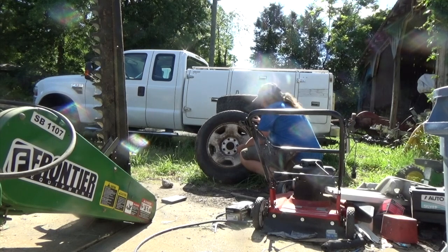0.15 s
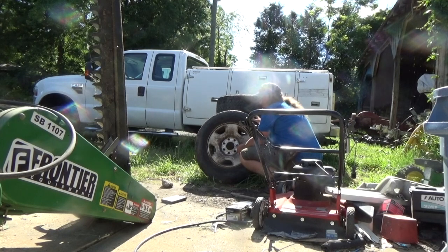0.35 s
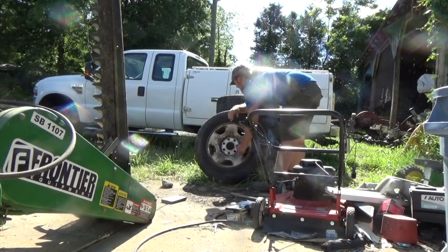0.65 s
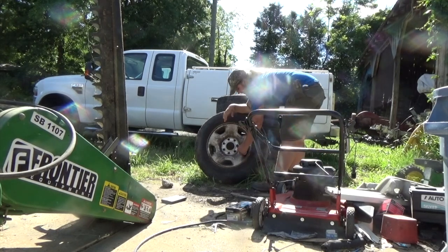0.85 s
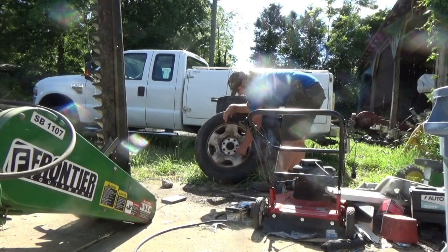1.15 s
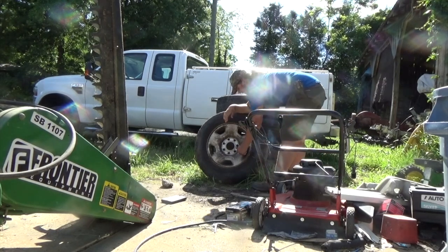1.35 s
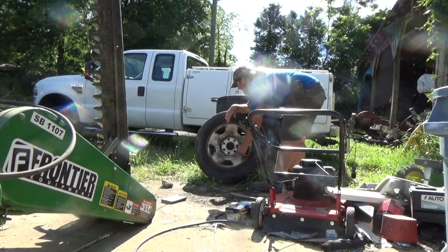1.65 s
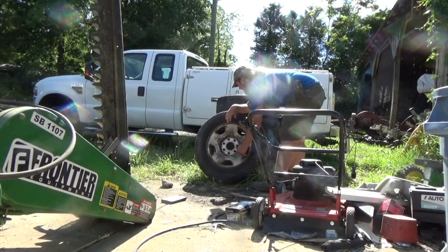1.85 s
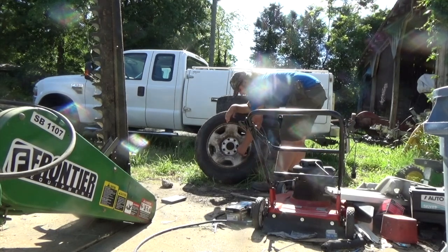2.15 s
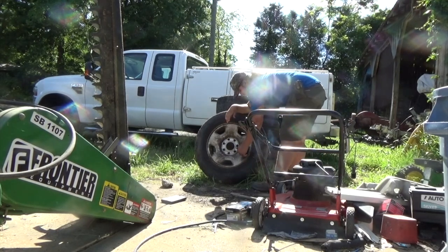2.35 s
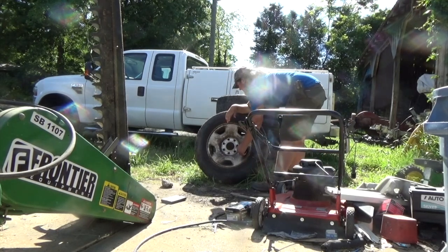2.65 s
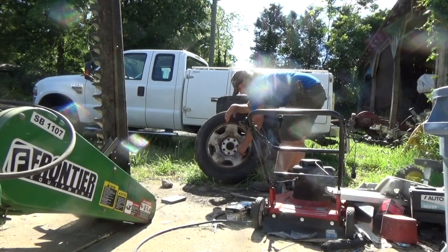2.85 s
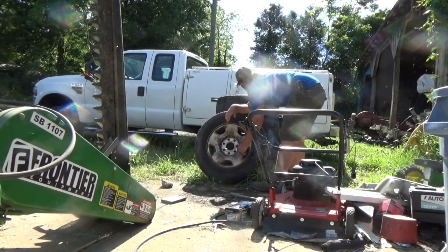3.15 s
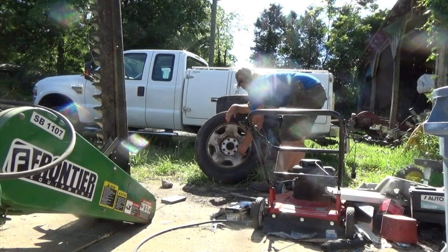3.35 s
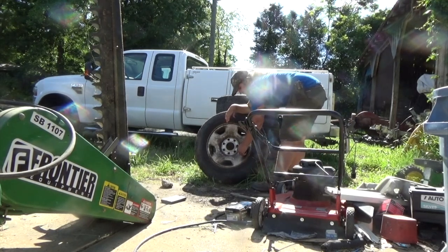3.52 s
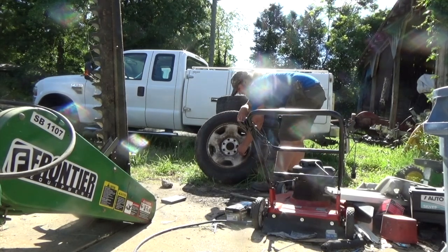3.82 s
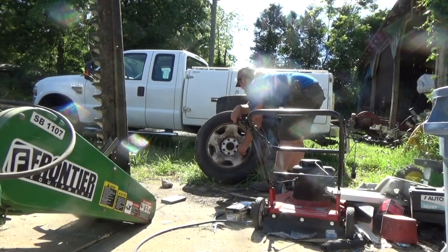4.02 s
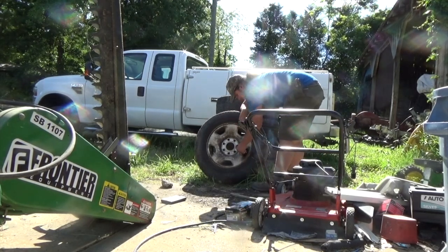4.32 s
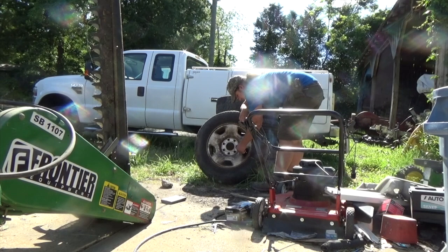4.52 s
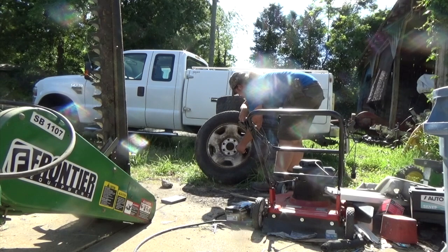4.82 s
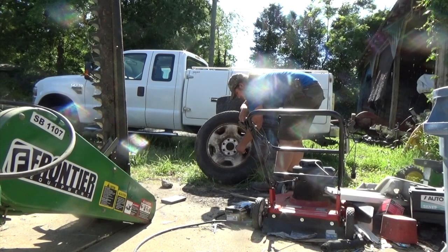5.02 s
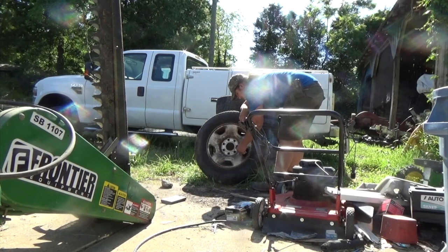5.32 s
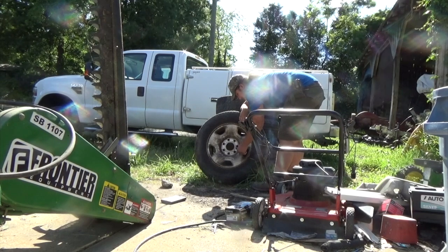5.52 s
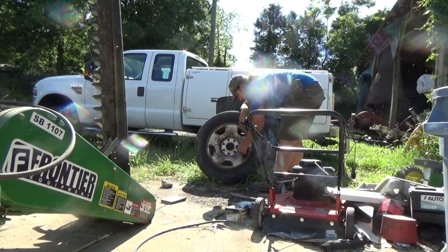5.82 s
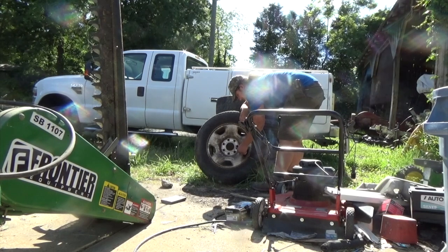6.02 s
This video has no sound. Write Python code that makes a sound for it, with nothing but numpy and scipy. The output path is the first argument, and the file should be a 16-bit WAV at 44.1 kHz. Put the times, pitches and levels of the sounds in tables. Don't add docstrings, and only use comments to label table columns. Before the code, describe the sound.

Air hisses steadily from a tire valve with a thin, high whistle, while fingers squeak on rubber, air sputters, and a tool clicks on the rim.

```python
import sys
import numpy as np
from scipy import signal
from scipy.fft import rfft, irfft
from scipy.io import wavfile
from scipy.ndimage import uniform_filter1d

SR = 44100
rng = np.random.default_rng(int(sys.argv[2]) if len(sys.argv) > 2 else 0)


def generate_wav(signal):
    frames = np.transpose(np.atleast_2d(signal))
    scaled = np.clip(frames, -1, 1) * 32767
    pcm = np.round(scaled).astype(np.int16)
    wavfile.write(sys.argv[1], SR, pcm)


def field_ratio(decibels):
    return 10 ** (np.asarray(decibels, dtype=float) / 20)


N = 272097

# (t/s, level/dB)
WHISTLE_LEVEL = [(0.0, -29), (0.57, -28.5), (0.62, -30), (1.67, -31), (2.32, -30.5), (2.97, -31),
                 (3.16, -27.5), (4.16, -24), (4.38, -26.5), (4.47, -25.5), (4.71, -26), (5.62, -24.5),
                 (5.7, -23), (6.17, -23.5)]
# (t/s, f/Hz, left-right level/dB)
WHISTLE_PITCH = [(0, 2399.9, 1.0), (1.5, 2399.7, .9), (3.0, 2400.1, 1.0), (3.5, 2400.6, 1.4),
                 (6.17, 2401, 1.3)]
# (t/s, depth/dB)
FALTERS = [(.955, 1.5), (1.262, 1.5), (1.72, 1.5), (1.86, 1), (2.56, 1.5), (2.82, 1), (3.01, 1), (3.125, 0),
           (3.36, 1.5), (3.48, 1), (3.7, 1.5), (3.83, 1), (3.94, 0.5), (4.295, 3), (4.35, 2.5), (4.41, 2),
           (4.6, 1), (4.77, 1), (4.915, 1), (5.35, 1.5), (5.55, 1), (5.63, 1.5)]
# (t/s, f/Hz)
FLUTTER_RATE = [(0, 328), (.7, 328.6), (1.25, 327.1), (2.25, 327.5), (3.25, 327.5), (4.25, 326.2),
                (4.75, 326.3), (5.25, 324.8), (6.17, 323)]
# (t/s, level/dB)
LOCK = [(0, 7), (.3, 1), (1.3, 1.5), (1.9, -1), (2.5, 5), (2.9, 0), (4.3, 5.5), (4.8, 4.5), (5.1, 8.5),
        (5.45, 12.5), (5.72, 9.5), (6.05, 12.5)]
# (whistle multiple, flutter multiple, start level/dB, middle level/dB, end level/dB)
COMBINATION_TONES = [(0, 2, -62.5, -62.5, -60.5), (0, 3, -64, -66, -64), (0, 4, -62, -61, -55.5),
                     (0, 12, -47.5, -50, -54.5), (0, 18, -50, -49, -60), (0, 24, -56, -58, -53),
                     (0, 30, -67, -55, -61), (1, -1, -50, -46.5, -55), (1, 1, -45.5, -51.5, -57.5),
                     (1, 2, -60, -61, -56.5), (1, 3, -48, -58.5, -50.5), (2, -1, -57, -60, -67),
                     (2, 1, -57, -57, -62), (3, 0, -50, -58, -59), (4, 0, -58, -66, -57)]
# (t/s, level/dB, gap resonance f/Hz, upper resonance relative level/dB, its f/Hz)
TURNED_JET = [(1.9, -38, 7500, -6, 11500), (2.17, -41.5, 8350, -5, 11600), (2.45, -39, 8400, -13, 12100),
              (2.71, -37.5, 6440, -11, 13600), (2.95, -39, 5840, -2, 11700), (3.27, -44, 6000, -5, 12000),
              (3.42, -38, 6000, -2, 11300), (3.58, -40.5, 6500, 1, 12600), (3.75, -44.5, 7140, -1, 13300),
              (4.35, -45, 6530, -6, 14000)]
# (t/s, peak level/dB, upper resonance relative level/dB, length/s, gap f/Hz)
PUFFS = [(2.225, -40, -6, .012, 8500), (2.294, -38, 3, 0.0092, 8800), (2.338, -32, -17, .01, 8600),
         (2.39, -31, -12, 0.022, 7600), (2.413, -33, -8, 0.022, 8800), (2.498, -36, -15, .012, 7500),
         (2.519, -24, -18, .023, 7600), (2.536, -34, -20, .022, 7800), (2.645, -42, -26, .03, 6500),
         (2.721, -35, -12, .01, 7000), (2.737, -19, -16, 0.0097, 6340), (2.759, -24, -16, .011, 5900),
         (2.774, -26, -14, .012, 6200), (2.796, -28, -7, 0.012, 6800), (2.809, -20, -8, 0.012, 5930),
         (2.856, -25.5, -11, 0.013, 5670), (2.888, -26, -12, .012, 4970), (2.96, -36, -2, .01, 5200),
         (2.973, -29, -8, .022, 7400), (3.007, -29, 1, 0.015, 6000), (3.046, -30, -10, .014, 6800),
         (3.063, -34, -12, 0.018, 4900), (2.83, -32, -12, .012, 5200), (2.922, -33, -10, .012, 4800),
         (3.091, -26, -7, .015, 4970), (3.152, -32, -8, .012, 5200), (3.177, -30.5, -4, .028, 6200),
         (3.202, -29.5, -1, .018, 5900), (3.464, -24, -8, 0.013, 6200), (3.487, -29, -16, 0.012, 6500),
         (3.498, -21.5, 1, 0.0092, 6400), (3.5, -31, -10, .023, 6300), (3.666, -32, -3, .01, 7000),
         (3.688, -29, -1, 0.026, 7000), (4.045, -34.5, -4, 0.043, 6100), (4.092, -37, -9, 0.022, 6500)]
# (t/s, f/Hz)
SLIP_RATES = [
    [(.31, 2950), (.316, 2300), (.343, 2950), (.348, 3450), (.354, 3470), (.3575, 2900), (.361, 2700),
     (.367, 2550), (.374, 2650)],
    [(.387, 2780), (.395, 2330), (.402, 2500), (.41, 2400), (.424, 2500), (.433, 2330), (.444, 2520),
     (.452, 2620), (.456, 2350)],
    [(.459, 2680), (.466, 2420), (.483, 2520), (.495, 2330), (.503, 2450), (.51, 2360), (.518, 2150)],
    [(.632, 3060), (.641, 2950), (.65, 2330), (.666, 2350), (.672, 2620), (.682, 2560)],
    [(.82, 2500), (.835, 2380), (.884, 2350), (.895, 2170), (.905, 2170), (.923, 2620), (.936, 2480)],
    [(1.422, 3200), (1.428, 2830), (1.444, 2720), (1.455, 2560), (1.461, 2250), (1.4625, 2520),
     (1.468, 2220), (1.473, 2200)],
    [(1.478, 2800), (1.481, 2800), (1.486, 2260), (1.491, 2150), (1.494, 2460), (1.5, 2300), (1.511, 2200),
     (1.52, 2520), (1.524, 3000)],
    [(1.806, 2900), (1.812, 2450), (1.818, 2200), (1.825, 2630), (1.84, 2140), (1.852, 2300)],
]
# (t/s, length/s, level/dB, loudest region f/Hz)
SQUEAKS = [(.343, 0.017, -25.5, 7200), (.344, 0.0074, -25, 11500), (0.352, 0.0076, -21.5, 12000),
           (0.361, 0.021, -27, 11100), (0.384, 0.014, -25, 9900), (0.4, 0.0073, -29, 4900),
           (0.478, .018, -37, 4900), (.5, .022, -37, 4500), (0.439, 0.021, -41, 5070),
           (0.356, .017, -35, 5300), (0.309, 0.011, -39, 5600), (1.457, .013, -38, 4700),
           (1.493, 0.018, -43, 4600), (1.512, .01, -42, 4800), (1.48, .011, -38, 4900),
           (.412, .02, -40, 4900), (.459, .009, -37, 5000), (.49, .008, -39, 4700), (.344, .006, -39, 3200),
           (.354, .007, -34, 3000), (.366, .007, -38, 5200), (1.43, .005, -35, 5500),
           (0.426, 0.012, -32.5, 9600), (.633, .016, -35, 5600), (.634, 0.0085, -27, 12000),
           (0.667, 0.013, -25, 12700), (.824, .012, -36, 14300), (0.873, .04, -39, 4500),
           (0.427, 0.055, -40, 2600), (1.441, 0.045, -37, 2700), (1.811, 0.028, -43, 2700),
           (0.9, 0.011, -32, 12500), (0.923, 0.01, -30, 9900), (1.422, 0.0055, -22.5, 11100),
           (1.424, 0.0037, -33, 6100), (1.442, 0.017, -32, 5200), (1.449, 0.023, -36, 7600),
           (1.47, 0.011, -27, 12500), (1.474, 0.008, -36, 5400), (1.496, 0.0066, -26.5, 13800),
           (1.521, 0.006, -32.5, 6000), (1.804, 0.0068, -21, 12700), (1.811, 0.0054, -26, 14300),
           (1.818, 0.0065, -30, 7500), (1.84, .012, -31, 14000)]
# (t/s, length/s, level/dB, loudest region f/Hz)
RUBS = [
    (.339, 0.064, -39, 3000),
    (.397, .125, -44, 4700),
    (0.615, 0.054, -43, 3000),
    (1.437, 0.082, -37, 4700),
    (1.479, .05, -46, 4500),
    (1.802, 0.029, -44, 4600),
]
# (t/s, peak level/dB, f/Hz, left-right level/dB)
TICKS = [(.346, -26, 650, 0), (0.354, -15, 1340, 0), (1.446, -24, 850, 0), (1.807, -28, 1240, 0),
         (4.951, -22, 1700, 3), (4.975, -10, 1500, 1), (5, -18, 1400, 3), (5.016, -19, 1350, -3),
         (5.037, -10, 1600, 4), (5.028, -19, 1400, 3), (5.062, -12.5, 1200, 0), (5.135, -10.5, 1400, -3),
         (5.238, -20, 1000, 0), (5.336, -10, 1500, 4), (5.347, -18.5, 950, -1), (5.353, -10.5, 1700, 1),
         (5.432, -11.5, 1600, -2), (5.443, -15, 1800, 0), (5.508, -24, 1200, 1), (5.6375, -17, 1100, 0),
         (5.641, -11.5, 1400, 0), (5.6685, -10.5, 1600, 0)]
# (t/s, peak level/dB, f/Hz, left-right level/dB)
KNOCKS = [(0.346, -25, 430, 0), (0.344, -33, 110, -1), (0.353, -22.5, 400, 0), (.351, -33, 130, 0),
          (.3535, -10, 3050, 0), (.346, -20, 3200, 0), (.367, -22, 4500, -2), (.635, -32, 3500, 0),
          (1.423, -31, 4000, 0), (1.806, -32, 5000, 2), (2.3, -30, 3200, 0), (2.346, -15, 2900, 3),
          (2.356, -18, 3300, 0), (2.32, -20, 2800, 0), (2.375, -20, 3000, 0), (2.41, -21, 2800, 0),
          (2.388, -21, 1300, -2), (2.53, -20, 3100, 0), (2.735, -19, 6500, 0), (2.976, -18, 7500, 0),
          (3.4955, -16, 6500, 0), (3.498, -14, 9000, 0), (1.088, -29, 400, 0), (1.088, -24, 3000, 0),
          (1.112, -32, 400, 0), (1.112, -24, 1200, 0), (1.13, -40, 90, 0), (5.641, -22, 3000, 0),
          (4.975, -25, 2900, -3), (5.037, -17, 3000, -3), (5.062, -18, 3300, 3), (5.325, -30, 250, 0),
          (5.324, -36, 95, -4), (5.353, -20, 3300, 0), (3.668, -20, 3200, 0), (3.7, -22, 3000, 0)]
# (f/Hz, level/dB per Hz)
HISS_SPECTRUM = [(20, -5.5), (100, -6), (600, -6), (1200, -3), (1800, 0), (2150, 4), (2350, 2), (2520, -2),
                 (3500, -2), (6000, -2), (10000, -1.5), (13500, -4), (16000, -1)]
# (t/s, level/dB)
FLOW = [(0, 1.5), (.43, 3.5), (1.12, 1.5), (2.08, 2), (2.63, 2), (3.2, 2), (3.56, 0), (4.0, 1.5), (4.19, 1),
        (4.42, -2), (4.86, -1.5), (5.5, 1), (6.17, 0)]
# (f/Hz, left-right likeness)
COHERENCE = [(60, 0.89), (550, 0.79), (1200, 0.94), (2400, 0.74), (5000, 0.52), (15000, 0.61)]
# (f/Hz, left-right level/dB)
BALANCE = [(60, -1.5), (240, -0.5), (950, -0.5), (3770, -1), (15000, -2.5)]
# (t/s, hiss share 0-1, whistle band share 0-1)
STEREO_SHARE = [(0, .05, .08), (3.15, .04, .05), (3.3, .08, .8), (3.8, .2, .85), (4.15, .5, .9),
                (4.25, .97, .95), (6.17, .97, 1)]

TOOL_FROM_S = 4.9


def evened(x):
    return x / np.sqrt(np.mean(x ** 2) + 1e-20)


def read(points, hz):
    f, value = np.transpose(points)
    return np.interp(np.log(hz + 1), np.log(f + 1), value)


def columns(rows, t):
    s, *rest = np.transpose(rows)
    return [np.interp(t, s, c) for c in rest]


def wander(hz):
    z = rfft(rng.standard_normal(N))
    lowpass = 1 + (np.fft.rfftfreq(N, 1 / SR) / hz) ** 2
    return evened(irfft(z / lowpass, N))


def panned(x, db):
    return np.array([x * field_ratio(db / 2), x * field_ratio(-db / 2)])


def add(mix, s, sound):
    part = mix[..., round(s * SR):][..., :sound.shape[-1]]
    part += sound[..., :part.shape[-1]]


def resonate(x, hz, width_hz):
    turn = np.exp(2j * np.pi * np.cumsum(hz) / SR)
    r = np.exp(-np.pi * width_hz / SR)
    smooth = signal.lfilter([(1 - r) ** 2], [1, -2 * r, r * r], x / turn)
    return (turn * smooth).real


def whistle():
    t = np.arange(N) / SR
    level_db, = columns(WHISTLE_LEVEL, t)
    hz, side_db = columns(WHISTLE_PITCH, t)
    flutter_hz, = columns(FLUTTER_RATE, t)
    lock_db, = columns(LOCK, t)
    note = 2 * np.pi * np.cumsum(hz + 0.44 * wander(hz=6.5)) / SR
    flutter = 2 * np.pi * np.cumsum(flutter_hz + 0.598 * wander(hz=26.0)) / SR
    falter_s = 0.014
    for s, db in FALTERS:
        u = np.arange(6000) / SR / falter_s
        add(level_db, s - falter_s, -db * u * np.exp(1 - u))
    octave_db = -45.5 - 0.4 * t + 1.0 * wander(hz=1.9)
    below_db = -52 + lock_db + 1.3 * wander(hz=7)
    sixth_db = -43.5 - 1.38 * t + 2.3 * wander(hz=44.7) + 2.0 * wander(hz=3.6)
    out = field_ratio(level_db + 0.12 * wander(hz=10.0) + 0.06 * wander(hz=25)) * np.sin(note)
    out += field_ratio(octave_db) * np.sin(2 * note + 1)
    out += field_ratio(below_db) * np.sin(note - 2 * flutter)
    out += field_ratio(sixth_db) * np.sin(6 * flutter)
    for m, n, *db in COMBINATION_TONES:
        tone_db = np.interp(t, [0, t[-1] / 2, t[-1]], db)
        level = field_ratio(tone_db + 1.7 * wander(hz=14.7) + 1.1 * wander(hz=1.5))
        out += level * np.sign(n + .5) * np.sin(round(m) * note + round(n) * flutter)
    return panned(np.sqrt(2) * out, side_db)


def turned_jet():
    t = np.arange(N) / SR
    level_db, gap_hz, upper_db, upper_hz = columns(TURNED_JET, t)
    inside = np.clip(np.minimum(t - TURNED_JET[0][0], TURNED_JET[-1][0] - t) / 0.3, 1e-4, 1)
    low = inside * field_ratio(level_db - 0.5 + 2.0 * wander(hz=30.4))
    high = field_ratio(upper_db) * low * field_ratio(2.0 * wander(hz=24.8))
    pull = low * gap_hz
    for s, db, octave_db, length, hz in PUFFS:
        u = np.arange(3000) / SR / (.5 * length)
        shape = field_ratio(db - 6.7) * np.exp(-1.2 * (u - 2) ** 2)
        start = s - .002 - .5 * length
        add(low, start, shape)
        add(pull, start, hz * shape)
        add(high, start, field_ratio(octave_db) * shape)
    air = rng.standard_normal((3, N)) * field_ratio(1.8 * wander(hz=600))
    band = signal.butter(4, [3900, 15000], "band", fs=SR, output="sos")
    air = signal.sosfilt(band, air[0] + .25 * air[1:])
    gap_hz = pull / low * (1 + .05 * wander(hz=120))
    out = []
    for x in air:
        gap = evened(resonate(x, gap_hz, width_hz=3600)) + .55 * evened(x)
        upper = evened(resonate(x, upper_hz, width_hz=3800))
        out.append(low * gap + high * upper)
    return np.array(out)


def squeak(s, length, db, loudest_hz):
    t = np.linspace(0, 1, round(length * SR) + 40)
    drift = uniform_filter1d(rng.standard_normal((2, 6000)), size=90, axis=1)
    sway, grip = drift[:, :len(t)] * np.sqrt(90)
    slip_hz = columns(sum(SLIP_RATES, []), s + length * t)[0] * (1 + (.008 + .08 * length) * sway)
    hz = slip_hz[None] * np.arange(1, 8)[:, None]
    ringing = np.exp(-(np.log(hz / loudest_hz) / .17) ** 2)
    weight = ringing + field_ratio(-9) * np.minimum(loudest_hz / hz, 1) ** 2
    phase = 2 * np.pi * np.cumsum(hz, axis=1) / SR + 6 * rng.random((7, 1))
    tones = weight * (hz < 16500) * np.sin(phase)
    level = field_ratio(db - 2 + (1.2 + 16 * length) * grip)
    scrape = .27 * np.diff(rng.standard_normal(6000))[:len(t)]
    return level * (evened(tones.sum(0)) + scrape) * signal.windows.tukey(len(t), .7)


def tick(db, hz):
    t = np.arange(1200) / SR
    snap = np.sin(2 * np.pi * hz * t) * hz * t * np.exp(-hz * t / .5)
    band = signal.butter(2, [.5 * hz, 2.2 * hz], "band", fs=SR, output="sos")
    rattle = evened(signal.sosfilt(band, rng.standard_normal((2, 1200)))) * np.exp(-t / 0.0036)
    return field_ratio(db + 2.5) * (snap + field_ratio(-20) * rattle)


def hand_and_tool():
    out = np.zeros((2, N))
    for s, *row in SQUEAKS + RUBS:
        add(out, s, panned(squeak(s, *row), db=-.4))
    for s, db, hz, pan_db in TICKS + KNOCKS:
        left, right = tick(db, hz) * field_ratio(np.clip(pan_db, -4, 4) * np.array([[.5], [-.5]]))
        lag_s = 9 / SR * (s > TOOL_FROM_S)
        add(out[0], s + .002, left)
        add(out[1], s + .002 + lag_s, right)
    out += field_ratio(-15) * np.roll(out[::-1], round(0.0097 * SR), axis=1)
    return out


def hiss():
    frames, hz = N // 128 + 5, np.fft.rfftfreq(512, 1 / SR)
    a, b, c, d, patches = rng.standard_normal((frames, 257, 5)).T
    patches = evened(uniform_filter1d(uniform_filter1d(patches, size=8, axis=0), size=20, axis=1))
    flicker = evened(uniform_filter1d(rng.standard_normal(frames), size=6))
    t = np.arange(frames) * 128 / SR
    moan = 0.24 * np.exp(-(np.log((hz + 1) / 1550) / 0.24) ** 2)[:, None] * columns(LOCK, t)[0]
    high = np.clip(np.log2((hz + 1) / 2200) / 2.8, 0, 1)[:, None]
    body_share = 0.51
    swell_db = (body_share + (1 - body_share) * high) * columns(FLOW, t)[0] + moan
    same = np.clip(read(COHERENCE, hz), -1, 1)[:, None]
    left = a + 1j * b
    right = same * left + np.sqrt(1 - same ** 2) * (c + 1j * d)
    z = np.array([left, right])
    z *= field_ratio(read(HISS_SPECTRUM, hz)[:, None] + swell_db + 0.9 * patches + 0.75 * flicker)
    z *= field_ratio(np.array([.5, -.5])[:, None] * read(BALANCE, hz))[:, :, None]
    return field_ratio(-32.5) * evened(signal.istft(z, nperseg=512, noverlap=384)[1][:, :N])


def narrowed(x):
    mid, side = (x[0] + x[1]) / 2, (x[0] - x[1]) / 2
    hz, t, z = signal.stft(side, SR, nperseg=2048)
    hiss_share, whistle_share = columns(STEREO_SHARE, t)
    band = (hz // 600).astype(int)
    luck = np.repeat(rng.random((len(t), band[-1] + 1)), 2, axis=0)[:len(t)].T
    tool = np.array([s for s, *_ in TICKS if s > TOOL_FROM_S])
    ticking = .05 + .9 * (abs(t[:, None] - tool - .012).min(axis=1) < .035)
    air_share = hiss_share * np.where((hz < 3000)[:, None], ticking, 1)
    share = np.where(abs(hz - 2400)[:, None] < 70, whistle_share, air_share)
    always = hz[:, None] < 1150 + 380 * luck[0] + 250 * hiss_share
    side = signal.istft(z * ((luck[band] < share) | always), SR, nperseg=2048)[1][:N]
    return np.array([mid + side, mid - side])


def scene():
    return whistle() + turned_jet() + hand_and_tool() + hiss()


def roll_off(x):
    return signal.sosfilt(signal.butter(12, 17100, fs=SR, output="sos"), x)


def record(dry):
    edge = signal.firwin(1201, 15820, window=("kaiser", 8), fs=SR)[None]
    limited = signal.oaconvolve(dry, edge, "same", axes=1)
    return roll_off(narrowed(limited))


dry = scene()
out = record(dry)
generate_wav(out)
```